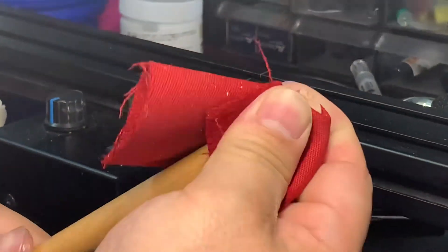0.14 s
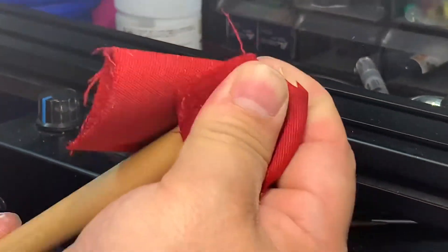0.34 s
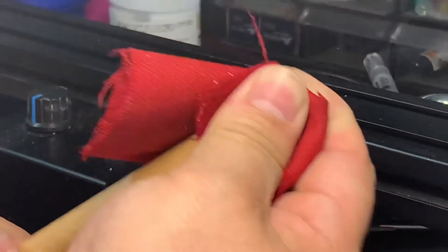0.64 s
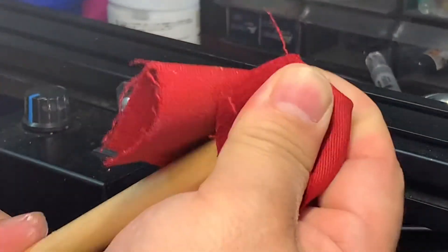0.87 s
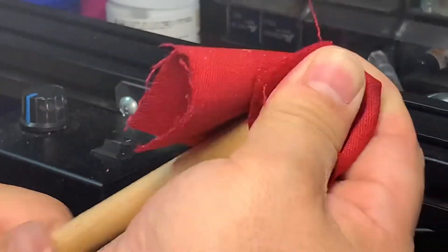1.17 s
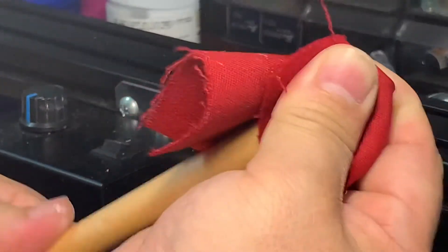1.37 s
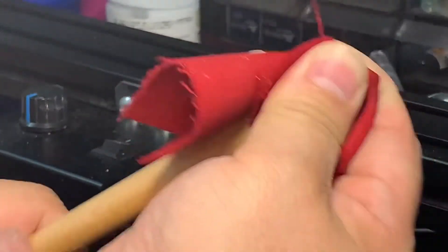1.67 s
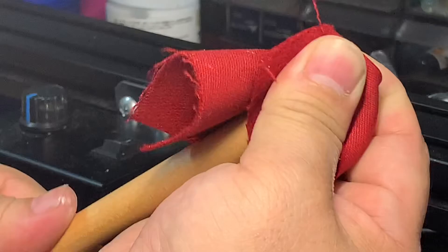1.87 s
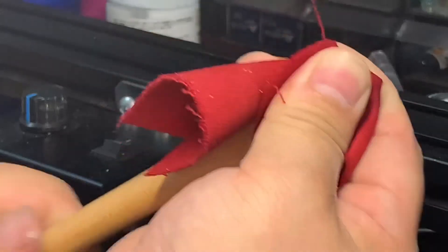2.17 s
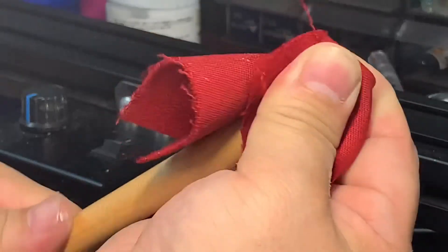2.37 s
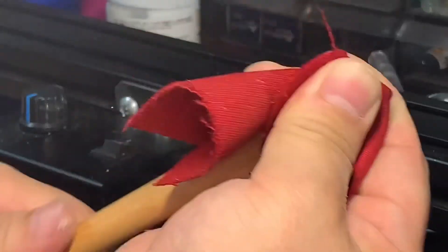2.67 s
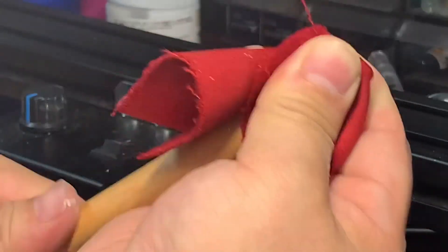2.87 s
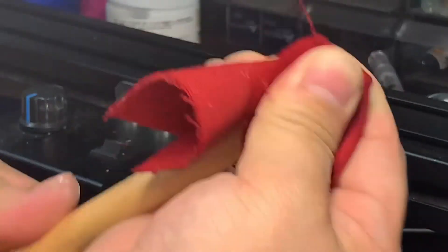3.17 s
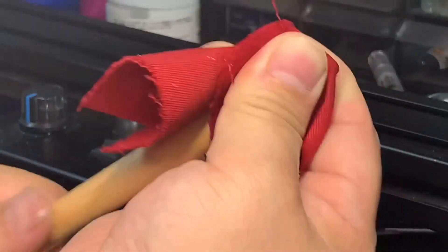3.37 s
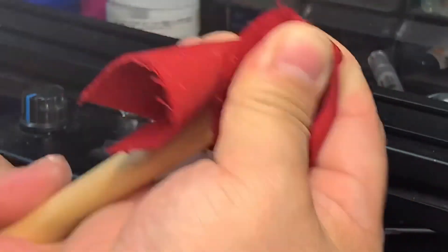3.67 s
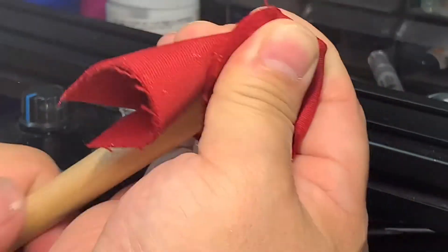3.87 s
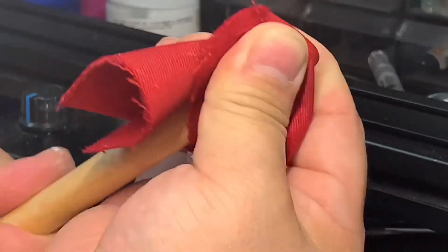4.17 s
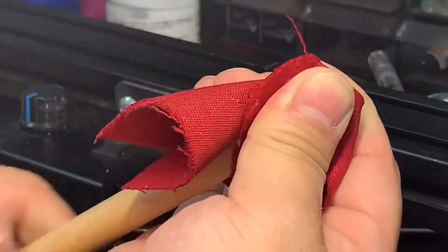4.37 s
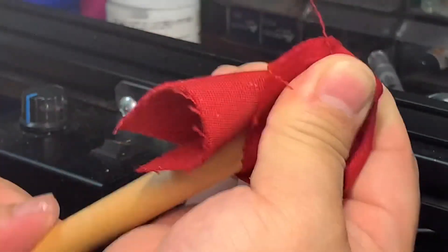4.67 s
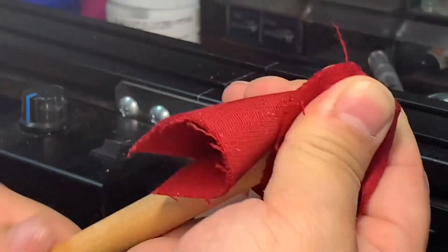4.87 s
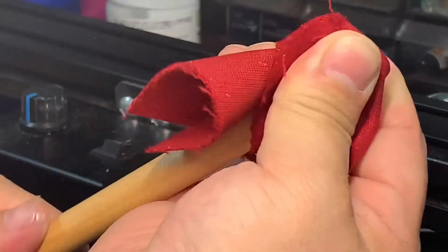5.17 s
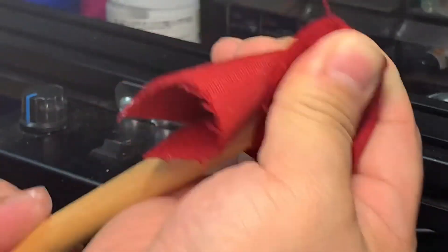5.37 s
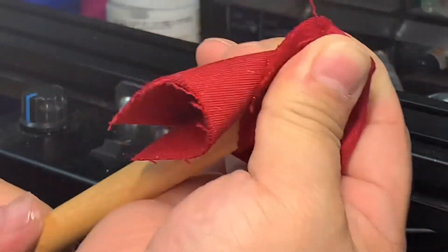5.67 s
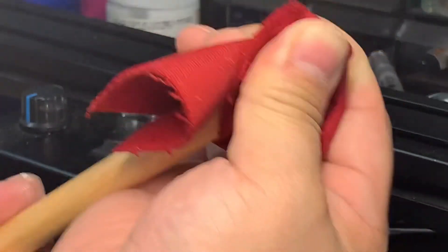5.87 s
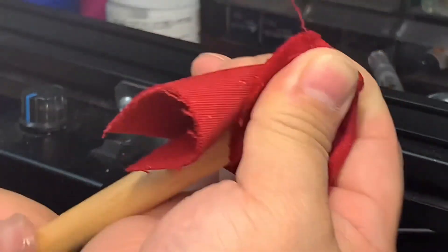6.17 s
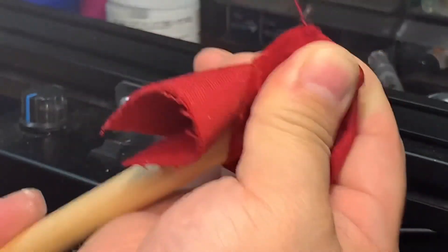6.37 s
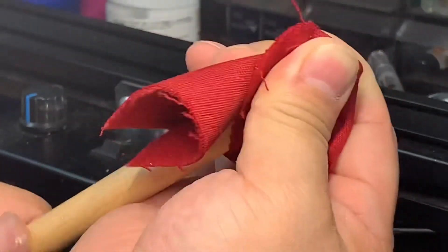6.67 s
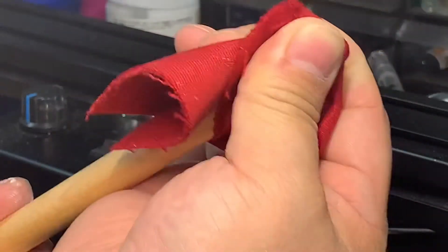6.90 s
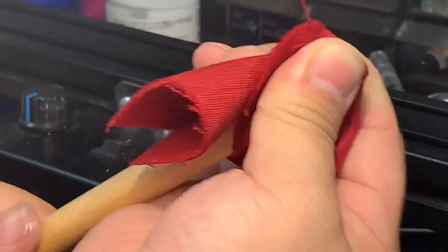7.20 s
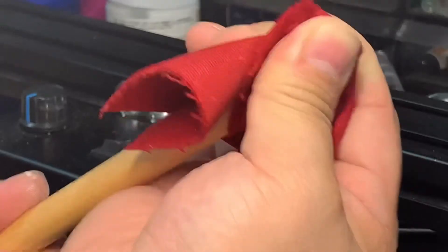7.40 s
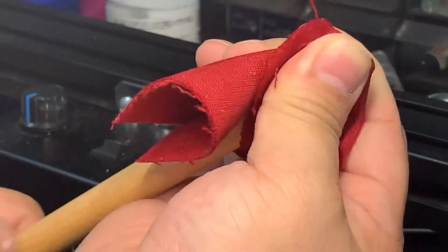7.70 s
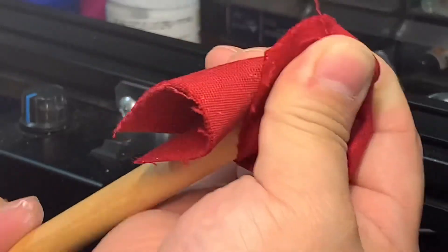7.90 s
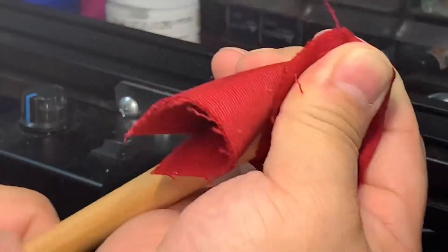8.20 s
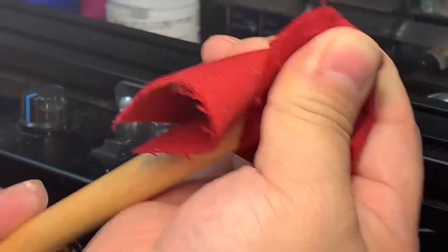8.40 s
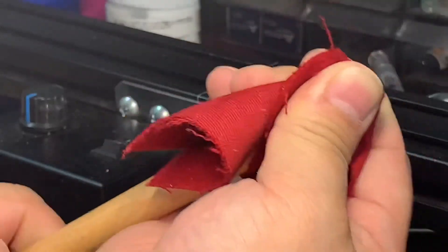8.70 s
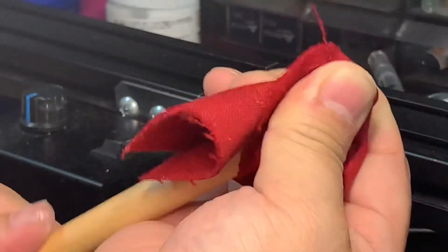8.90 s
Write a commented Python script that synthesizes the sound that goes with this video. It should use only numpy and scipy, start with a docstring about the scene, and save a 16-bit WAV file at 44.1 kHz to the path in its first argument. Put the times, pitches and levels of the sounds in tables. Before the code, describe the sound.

Heard very close in a small workshop, a leather cue tip is twisted inside a gripped cloth. The first rattle comes at 0.2 s, fairly soft and woody, then a split double one at 0.7-0.9 s. From 1.25 s the twists repeat about every 0.55 s until the last at 8.9 s, each a 0.1-0.16 s ratchet of roughly ten sharp clicks with dry scraping and a dull wooden buzz. They strengthen from about 1.8 s, and are loud and crisp from 4 s onward. Between them, bright grainy cloth rustle swells, dips and returns, with little brushing ticks, clearest near 3.4, 6.2 and 8.85 s. A very faint, breathy squeak glides down around 7.1-7.2 s. Underneath runs a low, lumpy hum, swelling near 8.4 s, with soft room noise slowly fading. Short, dull echoes follow the clicks.

```python
"""Fast rattles of clicks ring a wooden shaft, with cloth rustle and ticks between them, over a low lumpy hum.
A cue is twisted in a cloth gripped round its leather tip: on each twist the leather sticks and slips, and
each slip is a noise burst, a dragging tail and a dull push through the shaft modes. The hand turning back
rustles the cloth as grainy noise, once with a faint squeak. Close by stands a phone on the workbench of a
small shop, which adds short echoes, a hum of narrow low noise and resonant room noise."""
import sys
import numpy as np
from scipy import signal
from scipy.fft import rfft, irfft, next_fast_len
from scipy.io import wavfile
from scipy.ndimage import uniform_filter1d

SR = 44100
rng = np.random.default_rng(int(sys.argv[2]) if len(sys.argv) > 2 else 0)


def to_wav(sig):
    """Store sig (one row per channel, or 1-D mono) as 16-bit WAV at the path in sys.argv[1].

    Samples outside -1..1 are clipped; the rate is SR.
    """
    pcm = np.clip(np.atleast_2d(sig), -1, 1) * 32767
    pcm = np.round(pcm).astype(np.int16)
    wavfile.write(sys.argv[1], SR, pcm.T)  # frames by channels


N = 399105

# Twists of the cue; levels are relative: (start [s], length [ms], 5 slip rates evenly through it [1/s],
# 4 slip levels evenly through it [dB], bass gain [dB], treble gain [dB], 2 rings of the folded cloth [Hz],
# wood gain [dB], extra level of the second slip [dB])
TWISTS = [(0.1773, 143.0, 55.6, 90.45, 73.5, 115.8, 73.3, -38, -35.5, -38, -36, 6.5, 1.5, 2100, 5040, 5, 1),
          (0.7056, 41.0, 62.3, 57.25, 52, 46.6, 40.3, -37.5, -34.5, -32, -33, -0.5, 3.0, 3560, 4600, 0.5, 0),
          (0.7934, 80.0, 69.45, 119.4, 113.2, 69.3, 39.2, -33.5, -30.5, -30.5, -32, -0.5, 3.0, 3640, 4460, 0.5, -1),
          (1.2553, 157.0, 85.6, 75.2, 51, 130.5, 76.2, -36.0, -30.5, -30, -28, -2.0, 5.0, 3450, 4340, 0.5, -1),
          (1.7985, 164.0, 79.15, 51.38, 83, 125.7, 41.15, -33, -24.5, -25.5, -25, -5.5, 4.0, 3650, 4570, 0.5, 0),
          (2.354, 151.0, 71.5, 82, 77.5, 125.3, 60.9, -31, -30, -29.5, -28, -3.0, 5.5, 3320, 4460, 0.5, -6),
          (2.907, 135.0, 66.96, 73, 83, 105.5, 70.6, -38, -28, -31, -31.5, 3.5, 5.5, 3350, 4400, 0.5, -1),
          (3.4392, 149.0, 58.12, 97.96, 95.56, 117.1, 86.6, -28, -28, -29, -29, 1.0, 4.5, 3670, 2710, 0.5, -6),
          (4.005, 131.0, 107.6, 86.76, 110.1, 109.7, 84.2, -25.5, -24.5, -25, -27, 0.0, 2.5, 3120, 4320, 0.5, -11),
          (4.573, 139.0, 62.6, 100.9, 105.1, 121.7, 106.6, -32, -25, -27.5, -27, 1.0, 4.0, 3680.0, 6600, 0.5, -2),
          (5.1009, 159.0, 83.26, 85.3, 83.4, 135.3, 76.9, -31, -24.5, -28, -25, 1.5, 5.5, 3400, 4770, 0.5, -2),
          (5.698, 117.0, 39.8, 99.8, 120, 106.9, 70.2, -28, -28.5, -31.5, -30, 1.0, 6.0, 3600, 2620, 0.5, 2),
          (6.2056, 99.0, 59.8, 110.9, 127.7, 108.1, 71.1, -25, -29, -25, -30, -2.0, 5.0, 3620, 4630.0, 0.5, -2),
          (6.729, 114.0, 65.66, 95.65, 127, 126.3, 101, -25.5, -25.5, -28, -30, -0.5, 7.0, 3300, 2630.0, 0.5, -4),
          (7.2455, 112.0, 37.17, 80.46, 119.8, 104.8, 92.8, -28, -23.5, -29, -35.5, 1.0, 3.5, 3800.0, 5440.0, 0.5, 2),
          (7.77, 125.0, 74, 65.15, 115.2, 94.1, 95.2, -41, -22, -26.5, -30.5, 0.0, 7.0, 3600, 2600, 0.5, -8),
          (8.3136, 110.0, 71.1, 109.1, 120.1, 89.8, 112.3, -25.5, -25.5, -25, -32.5, -1.0, 6.0, 3500, 2560, 0.5, -5),
          (8.8659, 84.0, 59.8, 110.5, 121.5, 124.6, 112, -25.0, -25, -26, -28, 0.0, 5.5, 3320, 6360.0, 0.5, 1)]
# Colour of a slip, shared by the cloth: (frequency [Hz], relative gain [dB])
SLIP_COLOUR = [(80, -32), (200, -8), (452, -12), (565, -15.5), (1080, -9.5), (1850, -4), (3880, -6),
               (6900, -10), (10000, -11.5), (11800, -16), (14800, -18.5), (16800, -53.5)]


def undb(db):
    """Convert dB to amplitude gain."""
    return 10 ** (np.asarray(db) / 20)


def on_log(table, hz):
    """Read (frequency, value) points on a log-frequency axis."""
    f, v = np.transpose(table)
    return np.interp(np.log(hz + 1), np.log(f + 1), v)


def on_time(table):
    """Read (time, value) points at every sample."""
    return np.interp(np.arange(N) / SR, *np.transpose(table))


def shape(x, gain):
    """Filter with a complex gain that is a function of frequency."""
    size = next_fast_len(N + SR)
    hz = np.arange(size // 2 + 1) * SR / size
    return irfft(rfft(x, size) * gain(hz), size)[..., :N]


def unit(x):
    """Scale to rms 1."""
    return x / np.sqrt(np.mean(x ** 2))


def walk(rate_hz):
    """Random levels held 1 / rate_hz and smoothed twice over that time; rms 1."""
    hold = int(SR / rate_hz)
    steps = np.repeat(rng.standard_normal(N // hold + 1), hold)
    smooth = uniform_filter1d(uniform_filter1d(steps, hold), hold)
    return unit(smooth[:N])


def ring(hz, centre_hz, width_hz):
    """Response of one resonance, gain 1 at its centre."""
    return 1j * hz * width_hz / (centre_hz ** 2 - hz ** 2 + 1j * hz * width_hz)


def impulses(events, gain_db):
    """One impulse per (time, level) event."""
    train = np.zeros(N)
    s, db = np.transpose(events)
    np.add.at(train, (s * SR).astype(int), undb(db + gain_db))
    return train


def rubbing():
    """Slips ring the shaft; each twist has its own grip, which weighs the bands and rings the folded cloth."""
    events = slips()
    # the tear is bright, the drag after it is dull
    clicks = shape(tears(events, tear_s=.00045, snap=5.5), lambda hz: 1j * hz / (1200 + 1j * hz))
    scrape = shape(drag(events, drag_s=0.0057, drag_db=-4), lambda hz: hz / (hz + 700) / (1 + 1j * hz / 4500))
    source = undb(14.0) * clicks + scrape + creep() + jolts(events)
    rung = shape(ports(source), body)

    # index of the current twist; each grip takes over 30 ms before its twist
    starts_s = np.transpose(TWISTS)[0] - .03
    twist = np.maximum(np.searchsorted(starts_s, np.arange(N) / SR) - 1, 0)
    bass_db, treble_db, *fold_hz, wood_db = np.transpose(TWISTS)[11:16]
    bass = shape(rung, lambda hz: 1 / (1 + (hz / 1600) ** 4))
    treble = shape(rung, lambda hz: 1 - 1 / (1 + (hz / 6300) ** 6))
    out = rung + (undb(bass_db)[twist] - 1) * bass + (undb(treble_db)[twist] - 1) * treble
    wood = shape(out, lambda hz: 1 / (1 + (hz / 650) ** 6))
    out += (undb(wood_db)[twist] - 1) * wood
    for k, pair_hz in enumerate(np.transpose(fold_hz)):
        here = twist == k
        rings = sum(signal.lfilter(*signal.iirpeak(hz, 11, SR), out[:, here]) for hz in pair_hz)
        out[:, here] += undb(0.5) * rings
    return undb(8.5) * out


def slips():
    """(time, level) of every slip: the leather lets go each time turning has wound it up one more step."""
    scatter_db = 1.3
    out, step, u = [], np.arange(20), np.linspace(0, 1, 1000)  # u: fraction of the twist

    def even(points):
        return np.interp(u, np.linspace(0, 1, len(points)), points)

    for row, chance in zip(TWISTS, rng.standard_normal((len(TWISTS), len(step)))):
        length_s = row[1] / 1000
        wound = np.cumsum(even(row[2:7])) * length_s / len(u)
        at = np.interp(step, wound - wound[0], u)
        db = np.interp(at, u, even(row[7:11])) + row[16] * (step == 1) + scatter_db * chance
        out += zip(row[0] + length_s * at, np.where(at < 1, db, -np.inf))  # none past the end
    return out


def tears(events, tear_s, snap):
    """Short noise bursts of tearing fibres, each with an optional sharp snap at its crest."""
    t = np.arange(SR // 200) / SR
    s, db = np.transpose(events)
    bursts = rng.standard_normal((len(s), len(t))) * (t / tear_s) ** 2 * np.exp(-t / tear_s)
    bursts[:, int(2 * tear_s * SR)] += snap
    # equal energy before the levels
    bursts = bursts / np.sqrt(np.sum(bursts ** 2, axis=1, keepdims=True)) * undb(db)[:, None]
    out = np.zeros(N)
    first = ((s - tear_s) * SR).astype(int)
    np.add.at(out, first[:, None] + np.arange(len(t)), bursts)
    return out


def drag(events, drag_s, drag_db):
    """Surfaces drag on after each event: decaying noise, partly different at the two ports."""
    train = impulses(events, drag_db)
    shared, left, right = rng.standard_normal((3, N))
    envelope = signal.fftconvolve(train, np.exp(-np.arange(SR // 20) / SR / drag_s))[:N]
    return envelope * (shared + .8 * np.array([left, right]))


def creep():
    """Creeping cloth: noise swells up to the start of each twist and fades as fast after it."""
    creep_s, creep_db = 0.0052, -27.5  # creep_db is against the first slip level
    t = np.arange(N) / SR
    swell = sum(undb(row[7] + creep_db) * np.exp(-np.abs(t - row[0]) / creep_s) for row in TWISTS)
    return swell * rng.standard_normal(N)


def jolts(events):
    """Each slip jolts the shaft with a dull push of one shape: a low buzz at the slip rate."""
    jolt_hz, jolt_db = 870, 0.5
    train = impulses(events, jolt_db)
    return shape(train, lambda hz: 1 / (1 + 1j * hz / jolt_hz) ** 2) * SR / jolt_hz / (2 * np.pi)


def body(hz):
    """Click colour, shaft modes, and bending waves whose bass arrives late."""
    # modes of shaft and tip: (frequency [Hz], width [Hz], level over the click [dB])
    shaft = [(460, 43, -1), (1630, 46, -6.5), (10540, 1020, -3.5)]
    modes = 1 + sum(undb(db) * ring(hz, f, w) for f, w, db in shaft)
    bending = np.exp(-1j * 0.304 * np.sqrt(hz))
    return undb(on_log(SLIP_COLOUR, hz)) * modes * bending


def ports(pair):
    """Left and right microphone ports differ in phase and level by frequency, half on each side."""
    # lead of the left port: (frequency [Hz], phase [rad])
    left_lead = [(120, 1), (430, 0.59), (1810, -2), (2580, 1.5), (3790, 13.5), (4650, 13.5), (6630, 10),
                 (12100, 2.5), (15000, -1)]
    # left over right: (frequency [Hz], gain [dB])
    left_gain = [(150, -4.5), (500, 9), (2400, 3), (8000, 1)]

    def half(hz):
        return undb(on_log(left_gain, hz) / 2) * np.exp(.5j * on_log(left_lead, hz))

    return np.array([shape(pair[0], half), shape(pair[1], lambda hz: 1 / half(hz))])


def cloth():
    """Cloth on skin and wood, brighter than the slips: grainy noise rustle and short brushing ticks."""
    # ticks as the grip lets go or takes hold: (time [s], relative level [dB])
    tick_events = [(.444, -49), (.479, -52.5), (1.57, -56.5), (1.785, -59), (2.111, -50), (2.335, -52.5),
                   (2.635, -47.5), (3.429, -43), (3.74, -47.5), (4.265, -53), (4.564, -58), (4.84, -54),
                   (5.936, -52), (6.17, -43), (6.193, -37), (7.007, -53), (7.498, -51.5), (8.577, -49.5),
                   (8.847, -44)]
    grain = undb(rustle_db() + 2.1 * walk(140) + 1.77 * walk(30))
    shared, left, right = grain * rng.standard_normal((3, N))
    rustle = shared + 0.59 * np.array([left, right])
    brush = undb(18.5) * tears(tick_events, tear_s=0.0021, snap=0)
    ticks = brush + drag(tick_events, drag_s=0.012, drag_db=-7)

    def bright(hz):
        tilt_db = 1.0 * np.log2(hz / 4000 + 0.017)  # about 1 dB per octave
        return undb(on_log(SLIP_COLOUR, hz) + tilt_db)

    return shape(ports(rustle + undb(8) * ticks), bright)


def rustle_db():
    """Rustle level: toward its value as the hand lets go, to a lull, up to the grip before the next twist."""
    # hand turns back: (time [s], relative level at release [dB], in the lull [dB], at the next grip [dB])
    returns = [(.46, -63, -88, -61), (1.02, -54, -69, -61), (1.56, -53, -83.5, -60.5),
               (2.13, -54, -64.5, -57), (2.64, -55.5, -78, -59), (3.17, -54, -67, -62),
               (3.75, -57.5, -80, -66.5), (4.28, -56, -67.5, -63.5), (4.84, -53.5, -61.5, -64.5),
               (5.43, -56.5, -73, -62), (5.96, -57, -74, -64.5), (6.46, -55.5, -74, -64),
               (7.02, -55.5, -63, -60), (7.48, -60.5, -77.5, -65), (8.08, -56.5, -86, -64),
               (8.59, -60.5, -74, -63)]
    lull_after_s, regrip_before_s, first_grip_db = 0.066, 0.034, -61.5
    starts_s = np.transpose(TWISTS)[0]
    points = [(starts_s[0], first_grip_db)]
    for s, go_db, lull_db, grip_db in returns:
        next_s = starts_s[starts_s > s][0]
        points += [(s, go_db), (s + lull_after_s, lull_db), (next_s - regrip_before_s, grip_db)]
    return on_time(points)


def squeak():
    """Cloth on the shaft as the hand slides back: a breathy whistle gliding down, with a lower companion."""
    # glide: (time [s], frequency [Hz], relative level [dB])
    glide = [(7.09, 5250, -88), (7.12, 5150, -76), (7.18, 4850, -77), (7.21, 4700, -88)]
    s, hz, db = np.transpose(glide)
    t = np.arange(N) / SR
    wavering_hz = np.interp(t, s, hz) * (1 + .012 * walk(400))
    phase = 2 * np.pi * np.cumsum(wavering_hz) / SR
    tone = np.sin(phase) + .8 * np.sin(.82 * phase)
    return tone * undb(np.interp(t, s, db, -np.inf, -np.inf) + 3.0 * walk(60))


def reverb(dry, t60_low_s, t60_high_s, wet_db):
    """Shop echoes as decaying noise, independent for each port; the treble dies first."""
    t = np.arange(SR // 2) / SR
    noise = rng.standard_normal((2, len(t)))
    low = signal.sosfilt(signal.butter(1, 3000, fs=SR, output="sos"), noise)
    tail = low * undb(-60 * t / t60_low_s) + (noise - low) * undb(-60 * t / t60_high_s)
    tail = shape(tail, lambda hz: 1j * hz / (300 + 1j * hz))  # a small shop returns little bass
    onset = np.clip(t / 0.0022, 0, 1)
    tail = tail[:, :len(t)] * onset / np.sqrt(np.sum(tail ** 2) / 2)
    return undb(wet_db) * signal.fftconvolve(dry.mean(0)[None], tail, axes=1)[:, :N]


def shop():
    """Lumpy hum, rumble caught in a low room resonance, over room noise that is wider in the treble."""
    # chance level of the narrow low hum noise: (time [s], relative level [dB])
    hum_level = [(0.0, -46), (0.4, -66), (0.58, -50), (1.06, -46.5), (1.16, -56), (2.09, -44.5),
                 (2.14, -58), (2.44, -50), (2.92, -55.5), (3.58, -48), (4.66, -56.5), (4.69, -49),
                 (5.8, -50.5), (8.09, -48), (8.14, -59.5), (8.37, -38.5), (8.57, -56.5), (9.05, -50.5)]
    hum = unit(shape(rng.standard_normal(N), lambda hz: ring(hz, 51.6, 24) ** 3))
    hum = hum / (uniform_filter1d(np.abs(hum), SR // 4) + 0.35)  # evened, so the level follows the table
    hum_pair = np.array([undb(-1.9) * hum, np.roll(hum, -20)])  # nearer the right port
    hum_pair = undb(on_time(hum_level) + 3.0) * hum_pair

    level_db = 0.5 * walk(2.4) - 0.68 * np.arange(N) / SR  # the noise slowly dies down
    mid, side = rng.standard_normal((2, N)) * undb(level_db)
    mid = shape(mid, room)
    side = shape(side, lambda hz: room(hz) * np.clip(hz / 800, .22, 1))
    return hum_pair + undb(-59.5) / np.std(mid) * np.array([mid + side, mid - side])


def room(hz):
    """Colour of the room noise with narrow low resonances of the shop."""
    # room noise: (frequency [Hz], relative gain [dB])
    room_colour = [(30, -24.5), (110, -2.5), (190, -10.5), (250, -4), (330, -15), (600, -28.5), (1250, -21),
                   (3500, -43.5), (14500, -52)]
    # resonances: (frequency [Hz], width [Hz], level over the room noise [dB])
    drones = [(105.3, 13, 3), (147.4, 7.6, 6)]
    resonances = 1 + sum(undb(db) * ring(hz, f, w) ** 2 for f, w, db in drones)
    return undb(on_log(room_colour, hz)) * resonances


def scene():
    """Rubbing, cloth and squeak close by, their echoes, and the shop."""
    near = rubbing() + cloth() + squeak()
    return near + reverb(near, t60_low_s=0.23, t60_high_s=0.029, wet_db=-7.0) + shop()


def record(dry):
    """The phone cuts the top with a steep low-pass."""
    top_hz = 16700
    return signal.sosfilt(signal.ellip(10, .2, 70, top_hz, fs=SR, output="sos"), dry)


dry = scene()
out = record(dry)
to_wav(out)
```